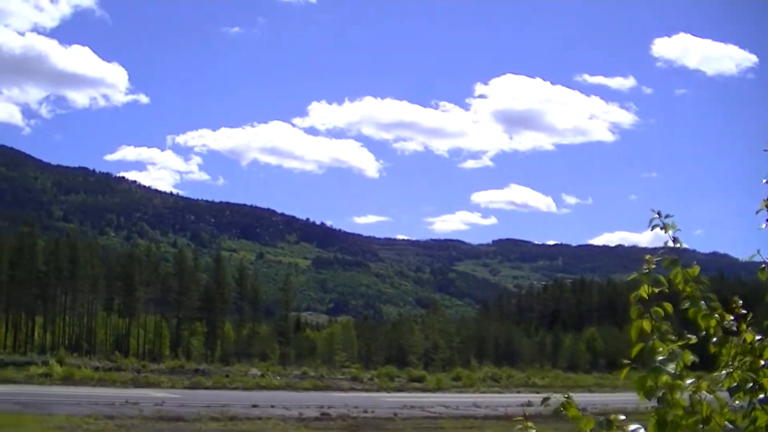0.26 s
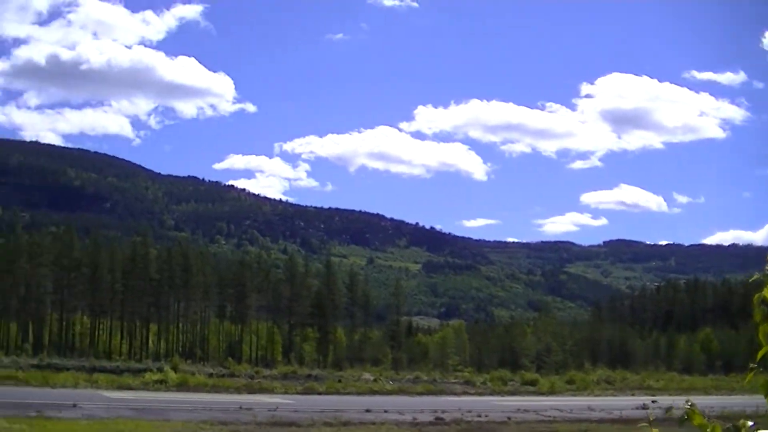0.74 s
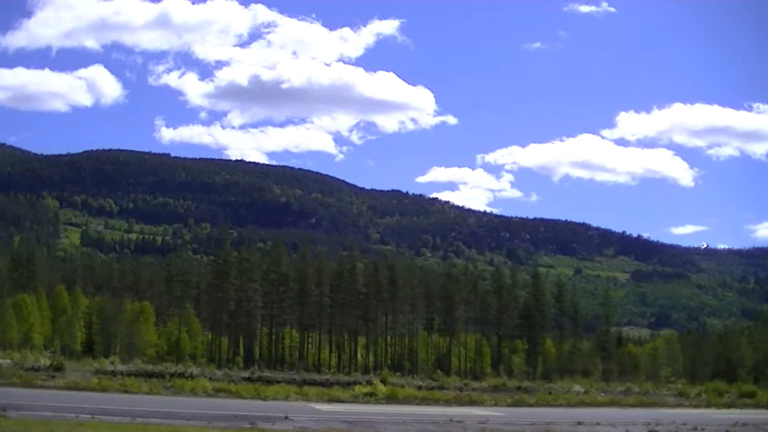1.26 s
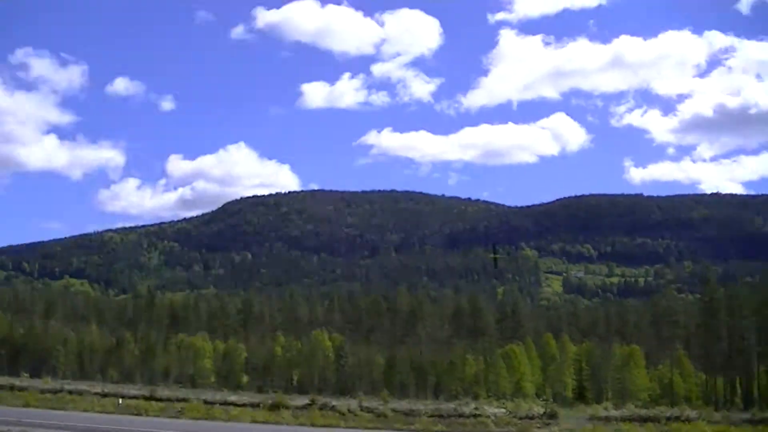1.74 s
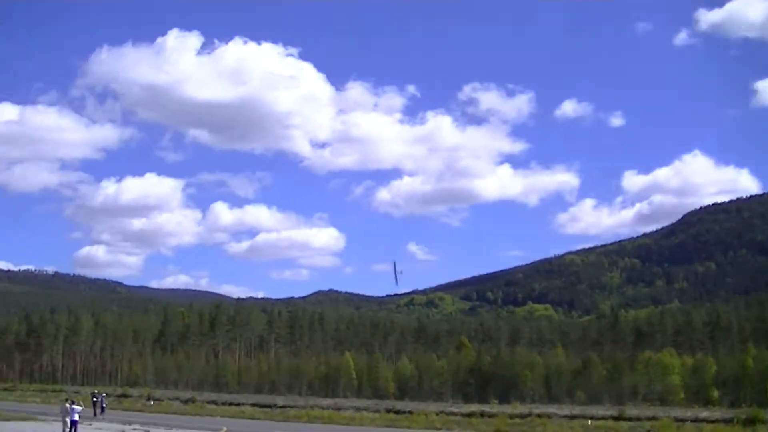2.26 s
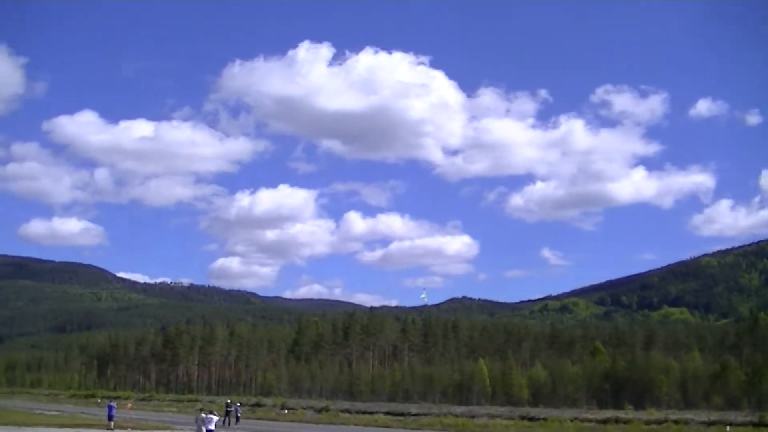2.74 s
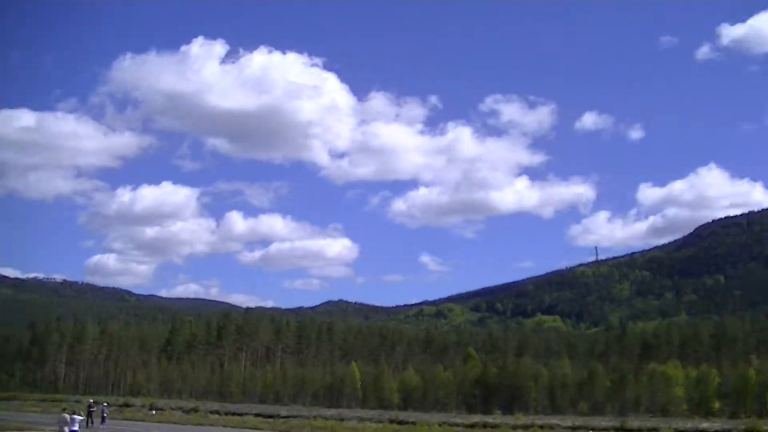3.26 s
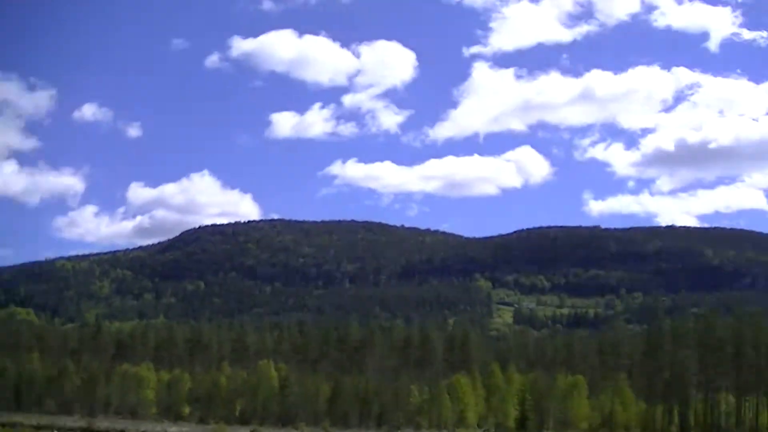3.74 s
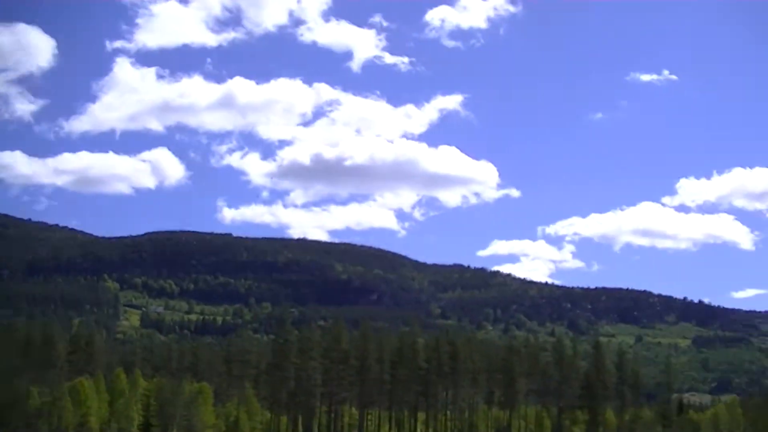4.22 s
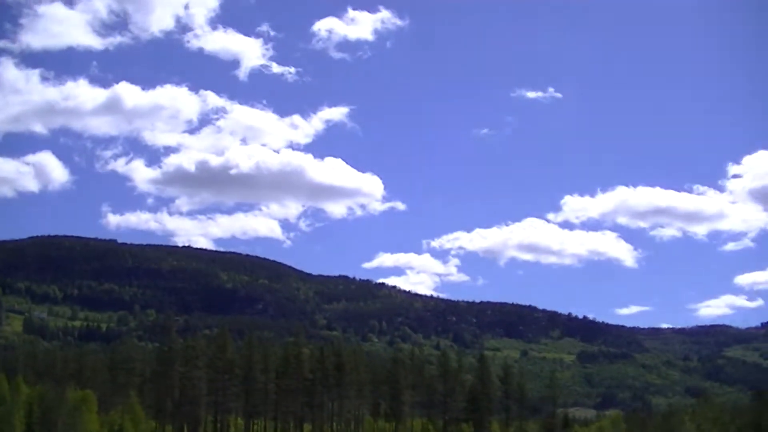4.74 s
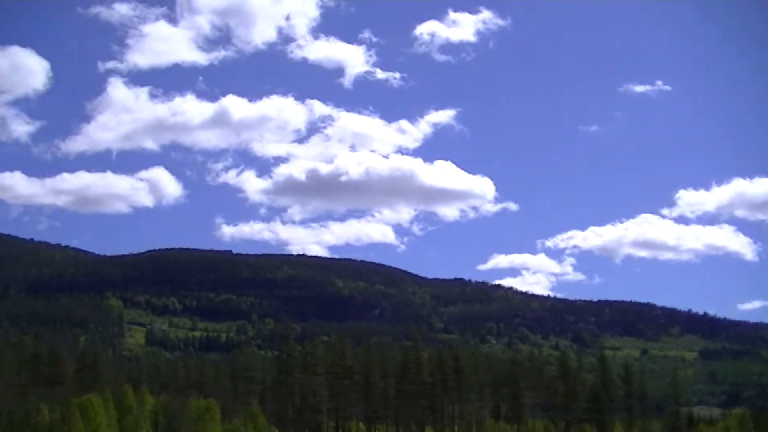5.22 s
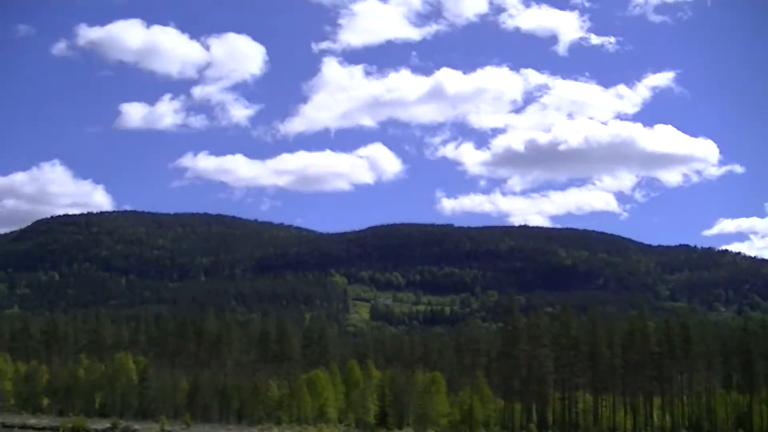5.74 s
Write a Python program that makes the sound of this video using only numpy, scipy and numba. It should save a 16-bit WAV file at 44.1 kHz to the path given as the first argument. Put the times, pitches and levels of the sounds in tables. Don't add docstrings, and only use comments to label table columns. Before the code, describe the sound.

A model jet's roaring, hissing rush swells past an open airfield, its thin turbine whine sliding down, then returning on a second pass.

```python
import sys
import numpy as np
from scipy import signal
from scipy.fft import rfft, irfft, next_fast_len
from scipy.io import wavfile
from scipy.ndimage import uniform_filter1d
from numba import njit

SR = 44100
rng = np.random.default_rng(int(sys.argv[2]) if len(sys.argv) > 2 else 0)


def master(y):
    cut = np.clip(np.atleast_2d(y).T, -1, 1)
    pcm = np.round(cut * 32767)
    wavfile.write(sys.argv[1], SR, pcm.astype(np.int16))


def field_ratio(decibels):
    return 10 ** (np.asarray(decibels, dtype=float) / 20)


N = 263718
T = np.arange(N) / SR


def curves(table):
    s, *columns = np.transpose(table)
    return [np.interp(T, s, c) for c in columns]


def unit(x):
    return x / np.sqrt(np.mean(x ** 2))


def walk(rate_hz):
    hold = int(SR / rate_hz)
    steps = np.repeat(rng.standard_normal(N // hold + 1), hold)
    slewed = uniform_filter1d(uniform_filter1d(steps, hold), hold)
    return unit(slewed[:N])


def colour(x, hz, gain):
    size = next_fast_len(N)
    log_f = np.log(np.fft.rfftfreq(size, 1 / SR) + 1)
    return irfft(rfft(x, size) * np.interp(log_f, np.log(hz), gain), size)[:N]


def delay(x, ms):
    return np.interp(T - ms / 1000, T, x)


def oscillator_phase(hz):
    return 2 * np.pi * np.cumsum(hz) / SR


@njit
def resonance(x, hz, width_hz):
    y, band, low = np.empty(len(x)), 0., 0.
    for i in range(len(x)):
        g, k = np.tan(np.pi * hz[i] / SR), width_hz / hz[i]
        v = (band + g * (x[i] - low)) / (1 + g * (g + k))
        band, low, y[i] = 2 * v - band, low + 2 * g * v, k * v
    return y


def camera():
    # start/s, end/s, level/dB
    motor_runs = [
        (.9, 1.3, -79),
        (3.6, 4.4, -76),
        (4.9, 6.2, -76),
    ]
    motor_hz, ramp_s, rumble_db, hiss_db = 60.5, 0.27, -61.5, -66
    phase = oscillator_phase(motor_hz * (1 + 0.04 * walk(14)))
    running = 0
    for start, end, db in motor_runs:
        running = running + field_ratio(db) * np.clip(np.minimum(T - start, end - T) / ramp_s + .5, 0, 1)
    hum = running * field_ratio(3 * walk(12)) * (np.sin(phase) + 0.97 * np.sin(2 * phase)) * np.sqrt(2)
    rumble = unit(colour(rng.standard_normal(N), [25, 40, 62, 90, 180, 400],
                         [0.3, 0.3, 0.9, 0.44, 0.35, 0.24]))
    hiss = [unit(colour(rng.standard_normal(N), [40, 300, 3000, 15000], [0.26, 0.63, 0.55, .1]))
            for _ in range(2)]
    return hum + field_ratio(rumble_db) * rumble + field_ratio(hiss_db) * np.array(hiss)


def eddy_gain_db(hz):
    # t/s, gain/dB, half length/s,
    # most affected f/Hz
    eddies = [(0.227, 5, 0.021, 2970), (0.437, 10.5, 0.024, 8800), (0.64, 10, 0.037, 4440),
              (0.936, 4.5, 0.025, 4370), (1.047, 11, 0.014, 8700), (1.16, 6, 0.012, 8000.0),
              (1.33, 12, 0.0092, 13000.0), (1.487, 6, 0.017, 13000.0), (2.198, 5.5, 0.026, 13000.0),
              (2.634, 5.5, 0.075, 6460), (2.755, 9.5, 0.035, 13100), (2.973, 3.5, 0.033, 2980),
              (3.138, 9, 0.023, 13000.0), (3.257, 10.5, 0.014, 9000.0), (3.317, 7, 0.014, 6500.0),
              (3.404, 10.5, 0.0083, 9000.0), (3.805, 5, 0.0099, 6500.0), (3.9, 5, 0.019, 13000.0),
              (3.982, 11.5, 0.0097, 6540), (4.046, 5, 0.014, 3000.0), (4.29, 9, 0.0078, 9000.0),
              (4.324, 7.5, 0.031, 680), (4.389, 9, 0.01, 13000.0), (4.69, 2.5, 0.017, 6500.0),
              (4.768, 6.5, 0.023, 6700), (5.32, 5, 0.015, 13230), (5.677, 17.5, 0.018, 12900),
              (5.838, 8.5, 0.018, 9300), (5.94, 5, 0.01, 9200),
              (0.135, -6, 0.024, 6500.0), (0.701, -12.5, 0.034, 6460), (0.798, -5, 0.015, 6500.0),
             (1.306, -3, 0.011, 6500.0), (2.043, -6, 0.059, 13000.0), (2.398, -4.5, 0.038, 9000.0),
             (2.917, -10, 0.041, 8000), (3.173, -1, 0.036, 1700.0), (3.567, -6.5, 0.054, 13200),
             (3.68, -3.5, 0.023, 3000.0), (4.227, -5, 0.035, 4500.0), (4.424, -5, 0.028, 4500.0),
             (4.53, -8, 0.0098, 12900), (4.532, -5, 0.031, 1720), (4.826, -1.5, 0.016, 3000.0),
             (4.88, -15, 0.013, 13000.0), (5.137, -11, 0.022, 6500.0), (5.15, -3.5, 0.023, 1670),
             (5.562, -6, 0.015, 13000.0), (5.795, -7, 0.015, 13060), (5.971, -8, 0.013, 12900),
              (0.562, 5, .015, 10000), (.83, 3, .015, 9000), (.95, 4, .015, 10000),
               (1.125, 4, .008, 10000), (1.087, -10, 0.0063, 4500), (1.866, -4.5, 0.01, 9000),
               (1.935, 0, 0.018, 9050), (2.142, -3, 0.016, 9000), (2.397, 3.5, 0.055, 2600),
               (2.735, -5.5, 0.036, 4500), (3.005, -0.5, 0.044, 2210), (2.7, -2, 0.0087, 2000),
               (2.857, -2.5, 0.015, 4560), (3.016, 4, .02, 2200), (3.298, 1.5, 0.09, 760),
               (3.95, 0, 0.085, 4500), (3.228, -1, 0.01, 8000), (3.857, -4, 0.013, 4500),
               (4.12, 0, 0.017, 8000), (4.597, 3.5, 0.0098, 7000), (4.947, 4.5, 0.018, 3000),
               (5.052, 2.5, 0.029, 9000), (5.246, 0.5, 0.019, 9000), (4.968, 1.5, 0.038, 1900),
               (5.76, 2, 0.041, 6000), (5.89, 3, 0.037, 6040), (5.934, 1, 0.018, 5530)]
    width_octaves, strength = 0.81, 0.84
    s, db, half_s, mid_hz = np.transpose(eddies)
    reach_db = db * np.exp(-.5 * (np.log2(hz / mid_hz) / width_octaves) ** 2)
    coarse = T[::64, None]
    passing = np.exp(-.5 * ((coarse - s) / half_s) ** 2)
    return strength * np.interp(T, coarse[:, 0], passing @ reach_db)


def side_tones(waver=0.0069, fade_s=.08, tone_db=-2.0):
    # start/s, end/s, start f/Hz, end f/Hz, level/dB
    glides = [
        (-.1, .5, 7200, 7600, -60),
        (1.11, 1.27, 4080, 4120, -32),
        (4.72, 5.3, 4520, 4450, -39),
    ]
    out = 0
    for start, end, start_hz, end_hz, db in glides:
        hz = np.interp(T, [start, end], [start_hz, end_hz]) * (1 + waver * walk(150))
        on = np.clip(np.minimum(T - start, end - T) / fade_s, 0, 1)
        twinkle_db = 4.8 * np.minimum(walk(30), 1)
        out = out + on * field_ratio(db + tone_db + twinkle_db) * np.sin(oscillator_phase(hz))
    return out


def whistle(waver=0.00404, fade_s=.05, tone_db=5.0):
    # t/s, f/Hz, level/dB
    passes = [
        [(0, 5060, -55), (.3, 5102, -45), (.5, 5116, -37), (.84, 5072, -38), (1, 5010, -32), (1.27, 4835, -36),
         (1.47, 4615, -29), (1.7, 4250, -25), (1.97, 3860, -31)],
        [(3.14, 3720, -46), (3.25, 3975, -28), (3.33, 4150, -31), (3.42, 4270, -35), (3.7, 4240, -31),
         (3.8, 4205, -29.5), (4, 4140, -30), (4.2, 4085, -44), (4.36, 3960, -48)],
        [(4.5, 3850, -42), (4.8, 3815, -41), (4.95, 3797, -30), (5.2, 3775, -34), (5.55, 3730, -38),
         (5.9, 3690, -50)],
    ]
    # t/s, level/dB
    octave = [(.85, -90), (1.05, -53), (1.3, -58), (1.49, -38), (1.8, -40), (2, -60), (3.9, -64),
              (4.05, -50), (4.3, -65)]
    cancels = [.17, .71, .87, 1.24, 1.3, 1.555, 1.81, 1.905, 3.21, 3.33, 3.52, 3.7, 3.85, 3.94, 4.83, 5.13,
               5.27, 5.38, 5.6]
    cancel_db, cancel_s, eddy_share = -12, .019, .5
    air_db = eddy_share * eddy_gain_db(4200)
    for s in cancels:
        air_db = air_db + cancel_db * np.exp(-.5 * ((T - s) / cancel_s) ** 2)
    octave_db = curves(octave)[0]
    out = 0
    for table in passes:
        hz, db = curves(table)
        start, end = table[0][0], table[-1][0]
        on = np.clip(np.minimum(T - start + fade_s, end + fade_s - T) / fade_s, 0, 1)
        phase = oscillator_phase(hz * (1 + waver * walk(150)))
        blade_twinkle_db = 1.6 * np.minimum(walk(60), 1)
        octave_twinkle_db = 3 * np.minimum(walk(35), 1)
        tone = field_ratio(db + air_db + blade_twinkle_db) * np.sin(phase)
        tone = tone + field_ratio(octave_db + octave_twinkle_db) * np.sin(2 * phase)
        out = out + on * tone
    return out * field_ratio(tone_db)


def exhaust(crackle_db=0.5):
    # f/Hz, level/dB per Hz
    spectrum = [(18, -82), (30, -96), (182, -31), (341, -10), (479, -12), (560, -4.5), (673, -1.5),
                (1050, -3), (1720, 0), (3780, -6), (4190, -6), (8270, -15), (10700, -25.5), (15500, -51.5)]
    fine_hz = np.geomspace(20, 20000, 400)
    hz, db = np.transpose(spectrum)
    turbulence = rng.standard_normal(N) * field_ratio(crackle_db * walk(900))
    return colour(turbulence, fine_hz, field_ratio(np.interp(np.log(fine_hz), np.log(hz), db)))


def bounces(x, dull_hz=6000, thin_hz=1000, wobble_ms=0.021, near_gain=0.93, far_gain=1.01):
    # t/s, lag/ms, share/0-1
    close_path = [(0, 1.16, .4), (.8, 1.18, .3), (1.8, 1.2, .3), (2.4, 1.3, .17), (3.4, 1.3, .15),
                  (3.8, 1.24, .45), (4.3, 1.25, .33), (4.8, 1.43, .15), (5, 1.56, .42), (5.4, 1.59, .4),
                  (5.7, 1.65, .1)]
    # t/s, lag/ms, share/0-1
    beside_path = [(0, 2.2, .12), (.35, 1.95, .22), (.78, 1.98, .22), (.95, 2.1, .04), (3.3, 2.3, .03),
                   (5.2, 2.05, .03), (5.55, 2.18, .16), (5.98, 2.32, .14)]
    # t/s, lag/ms, share/0-1, inverted forerunner share/0-1
    ground_path = [(0, 3.4, .1, 0), (.5, 2.62, .14, .08), (.76, 2.42, .33, .35), (1, 2.62, .2, .15),
                   (1.3, 2.45, .06, .12), (1.6, 2.66, .15, .15), (2, 2.8, .4, .25), (2.25, 2.64, .12, .25),
                   (2.8, 1.8, 0, .25), (3, 1.74, 0, .25), (3.2, 1.95, 0, .35), (3.5, 2.5, .14, .2),
                   (3.8, 2.81, .25, .15), (4.2, 3.14, .2, .1), (4.65, 4.52, .16, .05), (5.2, 5.71, .2, .05),
                   (5.65, 6.53, .22, .05), (5.98, 6.62, .21, .05)]
    # t/s, lag/ms, share/0-1
    late_path = [(1, 3, 0), (1.35, 3.07, .14), (2, 3.63, .2), (2.4, 3.06, .36), (2.8, 2.59, .48),
                 (2.95, 2.47, .48), (3.4, 3.05, .34), (3.65, 3.38, .25), (4, 3.85, 0)]
    # t/s, lag/ms, signed share
    edge_paths = [
        [(0, 0.13, -0.029), (1.5, 0.28, 0.12), (2.5, 0.16, -0.053), (3.1, 0.54, -0.01), (3.6, 0.23, -0.086),
         (4.6, 0.23, -0.14), (5, 0.24, -0.16)],
        [(0, 0.37, 0.021), (1.5, 0.42, 0.08), (2.5, 0.33, 0.13), (3.1, 0.32, 0.025), (3.6, 0.35, 0.044),
         (4.6, 0.39, 0.072), (5, 0.49, .0)],
        [(0, 0.56, -0.092), (1.5, 0.49, -0.11), (2.5, 0.44, -0.05), (3.1, 0.49, -0.076), (3.6, 0.43, -0.088),
         (4.6, 0.71, -0.03), (5, 0.51, -0.0064)],
        [(0, 1.6, -0.17), (1.6, 1.17, -0.012), (2, 2.5, -0.046), (3.1, 1.28, 0.065), (3.4, 0.59, -0.028),
         (4.6, 1.33, -0.068), (4.75, 2.3, -0.098), (5, 1.88, -0.055), (5.98, 2.1, -0.2)],
    ]
    # t/s, lag/ms, signed share
    glance_paths = [
        [(2, 1.58, 0.016), (2.2, 1.5, -0.18), (2.75, 1.62, -0.078), (3, 1.6, -0.1), (3.2, 1.7, -0.022)],
        [(3.2, .95, 0.022), (3.35, 0.97, 0.088), (3.8, 0.83, 0.096), (4.3, 0.89, 0.095), (4.6, 0.88, 0.075)],
        [(4.8, 1.68, 0.012), (5, 1.58, -0.12), (5.45, 1.7, -0.12), (5.6, 3, -0.019)],
    ]
    forerunner_ms = .15
    dull = signal.lfilter(*signal.butter(1, dull_hz, fs=SR), x)
    thin = signal.lfilter(*signal.butter(1, thin_hz, "high", fs=SR), dull)
    close_ms, close = curves(close_path)
    beside_ms, beside = curves(beside_path)
    ground_ms, ground, inverted = curves(ground_path)
    late_ms, late = curves(late_path)
    ground = ground * field_ratio(5.3 * walk(7))
    late = late * field_ratio(3.4 * walk(8))
    shake_ms = wobble_ms * walk(15)
    near = close * delay(dull, close_ms) + beside * delay(dull, beside_ms)
    far = ground * delay(dull, ground_ms + shake_ms)
    far = far - inverted * delay(thin, ground_ms + shake_ms - forerunner_ms)
    far = far + late * delay(dull, late_ms + shake_ms)
    out = x + near_gain * near + far_gain * far
    return out + sum(share * delay(out, ms) for ms, share in map(curves, edge_paths + glance_paths))


def air(x):
    band_hz = [130, 500, 1700, 4200, 6200, 8500, 12500]
    # t/s, nearness/dB, nozzle turned this way/dB, clear air/dB, intake turned this way/dB
    flight = [(0.0, -17, 4.5, -9.5, -2), (0.25, -12.5, 4, -3.2, -11.5), (0.6, -9, -3, 1.5, -4.5),
              (0.9, -8.5, 1.5, 2.5, -5), (1.25, -3, 0, 3.5, 3), (1.6, 1.5, -1.5, 1.5, 5),
              (1.9, 2, 3.5, 1.6, 7), (2.2, 5, 0.4, -5, 1.3), (2.55, 5.5, -5, 0.6, -9),
              (2.9, 3.5, -6, -7, -1), (3.05, 4, -8, 0.8, 0.5), (3.3, -4, 5.5, 0.8, -2),
              (3.75, -3, 8, 0.9, 0), (4.2, -4, 2.4, 1.5, -1.5), (4.55, -3, 1.1, 1.3, -3),
              (4.95, 1, -0.5, 1.5, -2.5), (5.4, -2.5, -0.3, 3, -6), (5.98, -3, 3, 3.5, -10)]
    # a row each for nearness, nozzle, clear air, intake; a column per band [dB/dB]
    follows = [(0.077, 1, 0.95, 0.78, 1, 0.93, 1.15), (0.45, 0.9, 0, 0.046, 0.049, 0.057, 0.061),
               (0.17, 0.14, 0, 0.57, 1, 0.92, 0.89), (0.5, 0.044, 0.041, 0.042, 0.36, 1.05, 1.45)]
    flutter_db = (0, .1, .3, .6, .7, .8, .8)
    own_db = (.3, .8, .9, 1.0, 1.0, 1.0, 1.4)
    flicker_db = (0, 0, .1, .5, 1.0, 1.3, 1.7)
    gust, quick = np.clip(walk(70), -2, 1.3), np.clip(walk(140), -2, 1.4)
    flight_db = np.transpose(follows) @ np.array(curves(flight))
    out = 0
    for i, share in enumerate(np.eye(len(band_hz))):
        band = colour(x, band_hz, share)
        gain_db = flight_db[i] + eddy_gain_db(band_hz[i])
        gain_db = gain_db + flutter_db[i] * gust + own_db[i] * walk(40) + flicker_db[i] * quick
        out = out + band * field_ratio(gain_db)
    return out


def shade(x):
    # t/s, broad shade/0-1, narrow shade/0-1 (negative boosts)
    shading = [(0, .35, 0), (1.2, .4, 0), (1.8, .3, 0), (2.2, .02, 0), (3.2, -.05, 0.27), (3.6, -.25, 0.6),
               (4.4, -.3, 0.7), (4.75, -.05, 0), (5.98, -.15, 0.05)]
    broad, narrow = curves(shading)
    x = x - broad * resonance(x, np.full(N, 7100.), 4200.)
    return x - narrow * resonance(x, np.full(N, 3680.), 420.)


def preamp(x):
    soft = np.tanh(.8 * x) / .8
    return signal.sosfilt(signal.butter(3, 130, "high", fs=SR, output="sos"), soft)


def microphones(x, edge_share=0.66):
    # t/s, broad share, cavity share, cavity f/Hz, rim share
    bearing = [(0, -0.14, .06, 5000, -0.0023), (1, -0.13, 0.068, 5100, -0.046),
               (1.8, -0.087, .12, 5400, -0.046), (2.3, -0.077, 0.17, 4900, 0.01),
               (3.2, -0.061, 0.22, 3950, 0.012), (3.6, -0.043, 0.18, 4340, 0.068),
               (4.6, -0.072, 0.22, 4370, 0.083), (5.3, -0.066, 0.027, 4400, 0.1),
               (5.98, -0.09, 0.011, 4340, 0.032)]
    broad, cavity, cavity_hz, rim = curves(bearing)
    bright = x - signal.lfilter(*signal.butter(1, 500, fs=SR), x)
    side = broad * bright
    side = side + cavity * resonance(x, cavity_hz, 860.)
    side = side + rim * resonance(x, np.full(N, 8000.), 7200.)
    side = side + edge_share * broad * resonance(x, np.full(N, 12000.), 3700.)
    return np.array([x + side, x - side])


def scene():
    jet_db = -18
    roar = air(unit(bounces(exhaust())) * field_ratio(jet_db))
    jet = shade(roar) + whistle() + side_tones()
    return microphones(preamp(jet)) + camera()


def band_limit(x):
    return signal.sosfilt(signal.butter(12, 15640, fs=SR, output="sos"), x)


def record(dry):
    thin = signal.sosfilt(signal.butter(2, 45, "high", fs=SR, output="sos"), dry)
    return band_limit(thin)


dry = scene()
out = record(dry)
master(out)
```